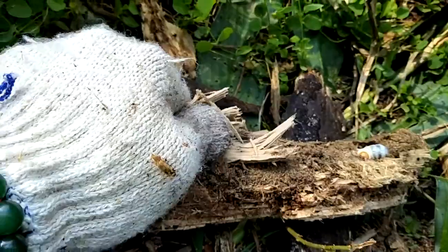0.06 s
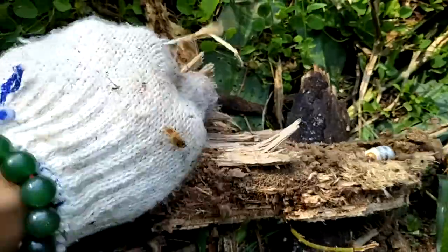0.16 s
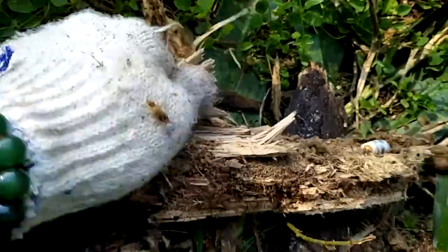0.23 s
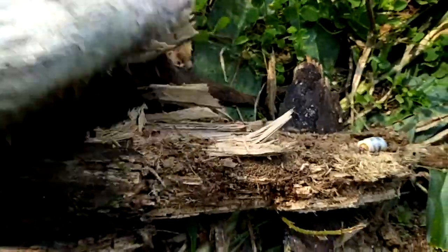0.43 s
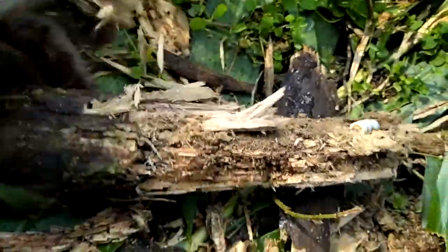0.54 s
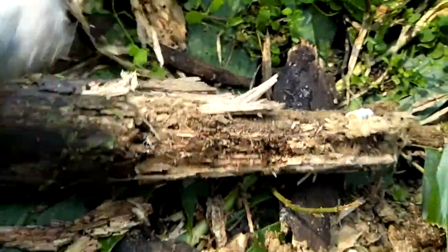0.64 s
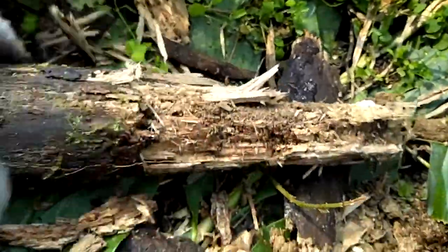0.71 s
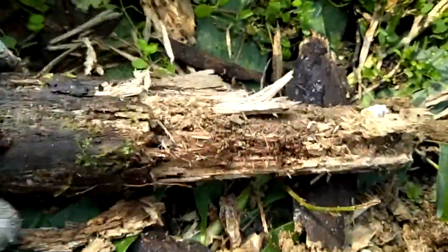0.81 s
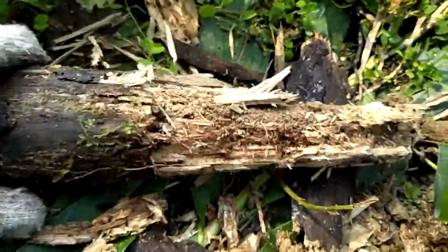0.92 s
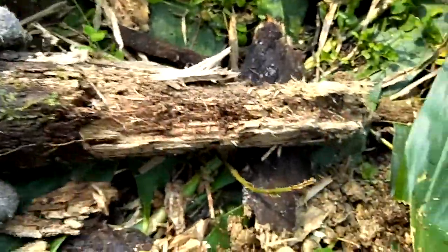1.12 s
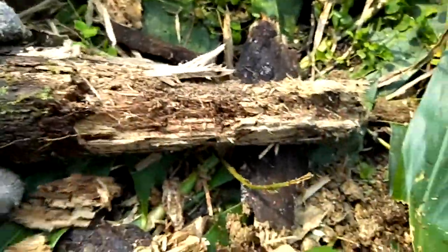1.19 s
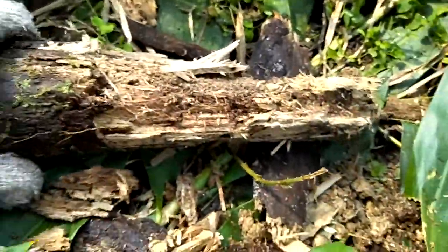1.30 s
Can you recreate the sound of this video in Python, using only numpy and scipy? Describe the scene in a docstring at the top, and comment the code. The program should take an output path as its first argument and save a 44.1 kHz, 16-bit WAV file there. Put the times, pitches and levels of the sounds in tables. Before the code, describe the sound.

Rotten wood snaps with one sharp crack as a gloved hand breaks a piece off a log, close by outdoors. Small chips fall and splinters tick while the knitted glove rustles softly over a faint low rumble.

```python
"""A piece snaps off a rotten log in a gloved hand, close by, outdoors. Fibres tick under strain, then
tear in one quick run; the release rings the log. Chips fall, the loose piece bumps, and ground and
undergrowth echo the wood faintly. The knitted glove rustles throughout, catching on crumbly wood.
Underneath: three soft low thumps, steady rumble, faint hiss."""
import sys
import numpy as np
from scipy import signal
from scipy.fft import rfft, irfft, next_fast_len
from scipy.io import wavfile

SR = 44100
rng = np.random.default_rng(int(sys.argv[2]) if len(sys.argv) > 2 else 0)


def dump_mix(stems):
    """Bounce the given channels to the path in sys.argv[1] as a 16-bit WAV at rate SR."""
    frames = np.atleast_2d(stems).T  # one column per channel
    limited = np.clip(frames, -1, 1)  # hard clip at full scale
    pcm = np.round(limited * 32767).astype(np.int16)
    wavfile.write(sys.argv[1], SR, pcm)


N = 59535

# Outdoor rumble spectrum: f/Hz, level/dB
RUMBLE_SPECTRUM = [(12, -28), (20, -20), (59, -0.5), (81, -0.5), (112, -3), (151, -10), (195, -23.5),
                   (258, -28), (497, -38), (640, -37), (700, -34), (910, -59), (1540, -120)]
# Outdoor hiss spectrum: f/Hz, level/dB
HISS_SPECTRUM = [(200, -11.5), (600, 4.5), (1000, 7), (3000, -4), (7000, -9), (15500, 0)]
# Glove rubbing on wood: t/s, relative level/dB, lower edge/Hz
RUB_TRACK = [(0, -50.5, 1690), (0.045, -55, 1660), (0.075, -53, 1250), (0.115, -54, 1900),
             (0.13, -56, 2300), (0.15, -51, 2250), (0.178, -48, 2000), (0.19, -42.5, 1700),
             (0.21, -41.5, 1600), (0.24, -37.5, 1390), (0.283, -47, 1430), (0.305, -35.5, 1590),
             (0.321, -56.5, 1370), (0.338, -41.5, 1530), (0.39, -45.5, 1570), (0.46, -47.5, 1710),
             (0.49, -46, 1760), (0.545, -52, 1900), (0.58, -46.5, 1900), (0.64, -43, 1710),
             (0.68, -40.5, 1160), (0.76, -41.5, 1290), (0.81, -39, 1280), (0.858, -39, 1180),
             (0.88, -43, 1010), (0.945, -46.5, 1390), (1.01, -41.5, 1680), (1.11, -43.5, 1580),
             (1.132, -42.5, 1770), (1.16, -42.5, 1600), (1.19, -46.5, 1550), (1.215, -39.5, 1370),
             (1.265, -52, 1630), (1.285, -41.5, 1690), (1.315, -51.5, 1900), (1.35, -43, 1950)]
# Rub grain spectrum: f/Hz, level/dB
RUB_SPECTRUM = [(300, -20), (900, -4.5), (1400, -2.5), (1900, -2.5), (2600, 0), (3600, -3), (4400, -9.5),
                (5300, -7), (6500, -23), (9000, -27), (15500, -32)]
# Treble fizz of the glove: t/s, level/dB
FIZZ_TRACK = [(0, -61.5), (0.118, -67), (0.127, -57), (0.148, -58), (0.187, -51.5), (0.21, -38.5),
              (0.24, -61), (0.305, -54), (0.32, -64.5), (0.55, -62.5), (0.62, -56.5), (0.68, -50),
              (0.77, -54), (0.852, -49.5), (0.88, -62), (0.96, -62), (1.03, -61), (1.11, -57), (1.22, -63),
              (1.27, -62.5), (1.35, -66)]
# Fizz spectrum: f/Hz, level/dB
FIZZ_SPECTRUM = [(3000, -10.5), (5500, 7.5), (7500, -2), (10000, -8.5), (13200, 1), (14500, -3.5),
                 (15800, -8)]
# Weight of a crack's treble setting: f/Hz, share/1
TREBLE_SHARE = [(4500, 0.058), (8000, 0.93)]
# Splinters cracking, crumbs crushing: t/s, level/dB, ring/Hz, treble/dB
TICK_EVENTS = [(0.0505, -32.5, 3200, -5), (0.0560, -29.5, 2280, 6), (0.0568, -36, 1410, -1),
               (0.1220, -41.5, 3260, -4), (0.1265, -36.5, 3060, 11.5), (0.1578, -33, 3870, 6),
               (0.1738, -31, 3000, -1), (0.1850, -28, 3030, 9), (0.2315, -35, 2300, -2),
               (0.2350, -40, 2300, 1), (0.2428, -43, 3500, -22), (0.2710, -35, 2960, 1),
               (0.4790, -36.5, 2460, -23), (0.5305, -40, 2960, 6), (0.5785, -42.5, 3130, 6),
               (0.6880, -30.5, 1920, -19), (0.9346, -33.5, 4930, -3), (1.0325, -35, 2800, -5),
               (1.0495, -36.5, 4800, -10), (1.0738, -36.5, 4660, 1), (1.0980, -35.5, 2090, -8),
               (1.1397, -31, 2580, -17), (1.1420, -33.5, 1550, -15), (1.1708, -38.5, 2030, 15),
               (1.2008, -33, 3040, -6), (1.2158, -41, 2600, -26), (1.2185, -34, 1900, -1),
               (1.3250, -36.5, 2660, 4), (1.3400, -43, 3200, -8)]
# Chips landing or shifting on the log: t/s, level/dB, ring/Hz, treble/dB
CHIP_EVENTS = [(0.2452, -29, 2550, -8), (0.2528, -30.5, 2500, -9), (0.2550, -40, 2800, -3),
               (0.3398, -27, 2880, -3), (0.3445, -35, 2850, -2), (0.3480, -29, 2670, -17),
               (0.3645, -39, 3030, -6), (0.3710, -37, 2440, -10), (0.4110, -35.5, 2740, -1),
               (0.5302, -30, 2570, 5), (0.6890, -30.5, 2500, -3), (0.9895, -33.5, 2550, -8),
               (0.9920, -33, 3540, -1), (1.0140, -33, 2440, -14), (1.0985, -32.5, 3450, -3)]
# Tick and chip spectrum: f/Hz, level/dB
TICK_SPECTRUM = [(200, -60), (700, -34.5), (1200, -9.5), (1800, -6), (2600, -3), (4000, -1.5), (5400, -0.5),
                 (6800, -8), (9500, -21.5), (13000, -8.5), (15500, -25)]
# Bumps of the loose piece: t/s, level/dB, ring/Hz, treble/dB
BUMP_EVENTS = [(0.4826, -42.5, 800, -6), (0.5050, -45.5, 760, -3), (0.5190, -47.5, 810, -5),
               (0.8880, -45, 900, 2)]
# Bump spectrum: f/Hz, level/dB
BUMP_SPECTRUM = [(200, -25), (800, -5), (2000, 2.5), (6000, -30)]
# Echo decay of ground and undergrowth: f/Hz, T60/s
ECHO_DECAY = [(300, 0.26), (1000, 0.44), (3000, 0.33), (8000, 0.21), (15000, 0.17)]
# Echo spectrum: f/Hz, level/dB
ECHO_SPECTRUM = [(300, 10.5), (1000, 6), (3000, -3), (8000, -23), (15000, 3)]
# Fibres tearing in the snap: t/s, level/dB, ring/Hz, treble/dB
FIBRE_EVENTS = [(0.2070, -53, 5250, 8), (0.2094, -27, 5000, 19), (0.2103, -18.5, 4660, 3),
                (0.2135, -13.5, 2920, -5), (0.2144, -12, 4030, -6.5), (0.2153, -19, 4620, -2),
                (0.2167, -13, 4870, -8), (0.2180, -18.5, 5360, 0), (0.2203, -14.5, 2700, 10),
                (0.2208, -17, 3350, 1), (0.2222, -17, 3320, 0), (0.2246, -21, 2800, 8),
                (0.2269, -28, 4650, 6), (0.2293, -28, 3850, 10)]
# Tear and crunch spectrum: f/Hz, level/dB
FIBRE_SPECTRUM = [(150, -19), (600, -29.5), (1100, -17.5), (1800, -9.5), (2700, 4), (4000, -2), (5400, 1),
                  (6500, -15.5), (8200, -21.5), (11800, -13), (15500, -24)]
# Modes of the log: f/Hz, level/dB, T60/s
LOG_MODES = [(343.7, -31.5, 0.055), (437, -26, 0.021), (546, -33.5, .025), (900, -17.5, 0.0081),
             (1098, -16, 0.012), (1347, -26.5, 0.032), (1900, -24.5, 0.038)]
# Soft low thumps: t/s, level/dB
THUMP_EVENTS = [(0.257, -47), (0.726, -47), (1.039, -50)]


def amp(db):
    """dB to gain."""
    return 10 ** (np.asarray(db) / 20)


def unit_rms(x):
    """Scale to rms 1."""
    return x / np.sqrt(np.mean(x ** 2) + 1e-20)


def along(points, hz):
    """Interpolate (f/Hz, value) points on a log axis."""
    knots_hz, values = np.transpose(points)
    return np.interp(np.log(hz + 1), np.log(knots_hz + 1), values)


def curves(track):
    """Per-sample curve for each column after t/s."""
    knots_s, *columns = np.transpose(track)
    return [np.interp(np.arange(N) / SR, knots_s, column) for column in columns]


def filtered(x, response):
    """Apply the gain response(hz)."""
    size = next_fast_len(N + SR // 2)
    return irfft(rfft(x, size) * response(np.fft.rfftfreq(size, 1 / SR)), size)[:N]


def coloured(x, spectrum):
    """Shape by a spectrum; rms 1."""
    return unit_rms(filtered(x, lambda hz: amp(along(spectrum, hz))))


def minimum_phase(gain):
    """Causal response with this gain, via the folded cepstrum."""
    cepstrum = irfft(np.log(np.maximum(gain, 1e-6)))
    half = len(cepstrum) // 2
    cepstrum[1:half] *= 2
    cepstrum[half + 1:] = 0
    return np.exp(rfft(cepstrum))


def moving_highpass(x, edge_hz, order=6.4, size=512):
    """High-pass with a per-sample edge."""
    hz, t, frames = signal.stft(x, SR, nperseg=size)
    frame_edge_hz = np.interp(t, np.arange(N) / SR, edge_hz)
    loss = np.sqrt(1 + (frame_edge_hz / (hz[:, None] + 1)) ** (2 * order))
    return signal.istft(frames / loss, SR, nperseg=size)[1][:N]


def outdoors(rumble_db=-50, hiss_db=-65.5):
    """Steady low rumble, faint hiss."""
    rumble = coloured(rng.standard_normal(N), RUMBLE_SPECTRUM)
    hiss = coloured(rng.standard_normal(N), HISS_SPECTRUM)
    return amp(rumble_db) * rumble + amp(hiss_db) * hiss


def grains(rate_per_s, spread_db):
    """Tiny slips: impulses of random time, size and sign."""
    slips = rng.random(N) < rate_per_s / SR
    level_db = spread_db * np.clip(rng.standard_normal(N), -2, 2)
    return slips * amp(level_db) * rng.choice([-1, 1], N)


def crumbs(rate_per_s=350, centre_hz=2800, log_spread=0.209, spread_db=3.9, t60_s=0.02):
    """Crumbs roll under the glove, each a brief damped note; rms 1."""
    count, size = 900, 512
    gaps_s = rng.exponential(size=count) / rate_per_s
    pitch, strength = rng.standard_normal((count, 2)).T
    t = np.arange(size) / SR
    hz = centre_hz * np.exp(log_spread * pitch[:, None])
    notes = amp(spread_db * strength[:, None] - 60 * t / t60_s) * np.sin(2 * np.pi * hz * t)
    starts = (np.cumsum(gaps_s) * SR).astype(int)
    indices = starts[:, None] + np.arange(size)
    return unit_rms(np.bincount(indices.ravel(), notes.ravel(), N)[:N])


def glove(crumb_db=-6, trim_db=-0.43):
    """Knit catches on crumbly wood: grains, crumbs, fizz. Harder pressure lowers the rustle's edge."""
    rub_db, edge_hz = curves(RUB_TRACK)
    fizz_db, = curves(FIZZ_TRACK)
    rub = coloured(grains(rate_per_s=4000, spread_db=2), RUB_SPECTRUM)
    rustle = moving_highpass(rub + amp(crumb_db) * crumbs(), edge_hz)
    fizz = coloured(grains(rate_per_s=8100, spread_db=7), FIZZ_SPECTRUM)
    return amp(rub_db + trim_db) * rustle + amp(fizz_db) * fizz


def cracks(events, spectrum, t60_s, spray_db, ring_db, width_hz, size=4096):
    """Per event: sudden release plus a dying spray of tiny breaks, through the splinter's resonance."""
    out = np.zeros(N + size)
    t, hz = np.arange(size) / SR, np.fft.rfftfreq(size, 1 / SR)
    for start_s, level_db, ring_hz, treble_db in events:
        spray = rng.standard_normal(size) * amp(-60 * t / t60_s)
        force = (t == 0) + amp(spray_db) * spray / np.linalg.norm(spray)
        resonance = 1 + amp(ring_db) / (1 + (2 * (hz - ring_hz) / width_hz) ** 2)
        colour = amp(along(spectrum, hz) + treble_db * along(TREBLE_SHARE, hz))
        crack = irfft(rfft(force) * minimum_phase(resonance * colour))
        crack *= np.sqrt(SR / 1000) / np.linalg.norm(crack)  # energy of 1 ms at rms 1
        start = round(start_s * SR)
        out[start:start + size] += amp(level_db) * crack
    return out[:N]


def splinters():
    """Splinters tick dryly, chips land with a woody note, the loose piece bumps."""
    ticks = cracks(TICK_EVENTS, TICK_SPECTRUM, t60_s=0.016, spray_db=9.5, ring_db=12.5, width_hz=950)
    chips = cracks(CHIP_EVENTS, TICK_SPECTRUM, t60_s=0.0091, spray_db=-9.5, ring_db=25.5, width_hz=340)
    bumps = cracks(BUMP_EVENTS, BUMP_SPECTRUM, t60_s=0.038, spray_db=3, ring_db=19, width_hz=340)
    return ticks + chips + bumps


def undergrowth(x, gain_db=-18):
    """Weak echo scattered by ground and plants; treble dies first."""
    hz, t, frames = signal.stft(rng.standard_normal(SR // 2), SR, nperseg=256)
    decay = amp(-60 * t / along(ECHO_DECAY, hz)[:, None])
    tail = signal.istft(frames * decay, SR, nperseg=256)[1]
    echo = signal.fftconvolve(x, tail / np.linalg.norm(tail))[:N]
    return filtered(echo, lambda hz: amp(gain_db + along(ECHO_SPECTRUM, hz)))


def tear(crunch_db=-21.5, peak_s=0.217, sigma_s=0.0065):
    """Fibres break in quick succession over a swelling, fading crunch of finer ones."""
    fibres = cracks(FIBRE_EVENTS, FIBRE_SPECTRUM, t60_s=0.0055, spray_db=-1, ring_db=7, width_hz=310)
    crunch = coloured(grains(rate_per_s=6000, spread_db=5), FIBRE_SPECTRUM)
    t = np.arange(N) / SR - peak_s
    swell = np.exp(-(t / sigma_s) ** 2 / 2)
    return fibres + amp(crunch_db) * swell * crunch


def log_knock(start_s=0.2203, attack_s=0.00037):
    """The piece lets go and rings the log: damped modes of alternating sign."""
    t = np.maximum(np.arange(N) / SR - start_s, 0)
    ring = sum((-1) ** k * amp(level_db - 60 * t / t60_s) * np.sin(2 * np.pi * hz * t)
               for k, (hz, level_db, t60_s) in enumerate(LOG_MODES))
    return ring * (1 - np.exp(-t / attack_s))


def thumps(pitch_hz=160, sigma_s=0.0077):
    """Soft low thumps: Gaussian tone bursts."""
    out = np.zeros(N)
    for centre_s, level_db in THUMP_EVENTS:
        t = np.arange(N) / SR - centre_s
        envelope = np.exp(-(t / sigma_s) ** 2 / 2)
        out += amp(level_db) * envelope * np.sin(2 * np.pi * pitch_hz * t)
    return out


def scene():
    """Mono mix: breaking wood, its echo, glove, thumps, background."""
    wood = tear() + log_knock() + splinters()
    return (wood + undergrowth(wood) + glove() + thumps() + outdoors())[None]


def record(dry):
    """Brick-wall low-pass."""
    top_hz = 15800
    return np.array([filtered(channel, lambda hz: hz < top_hz) for channel in dry])


dry = scene()
out = record(dry)
dump_mix(out)
```